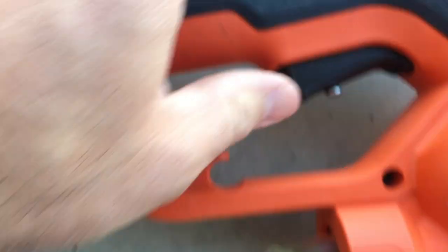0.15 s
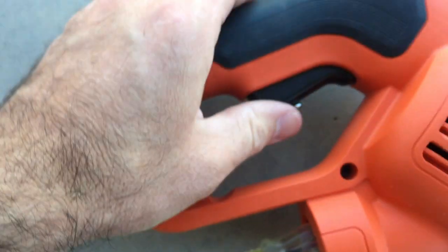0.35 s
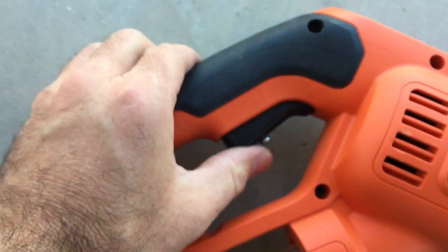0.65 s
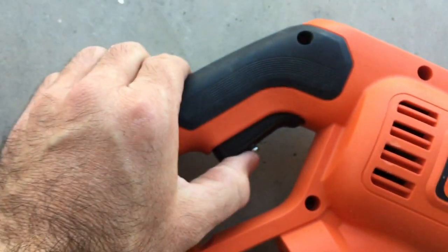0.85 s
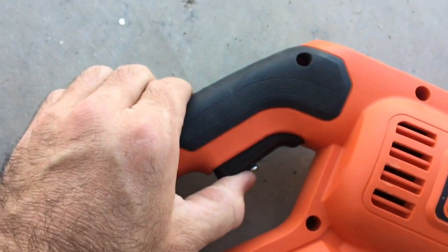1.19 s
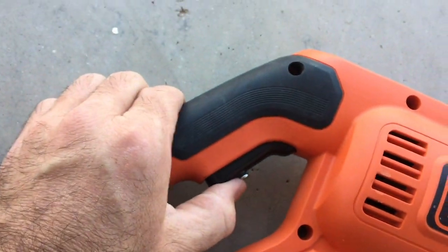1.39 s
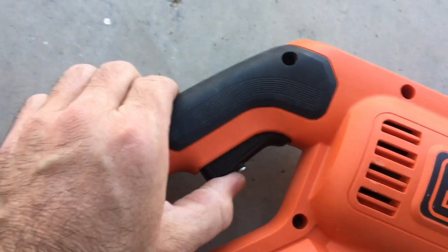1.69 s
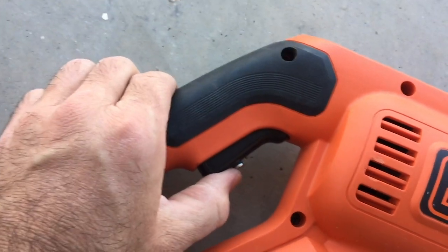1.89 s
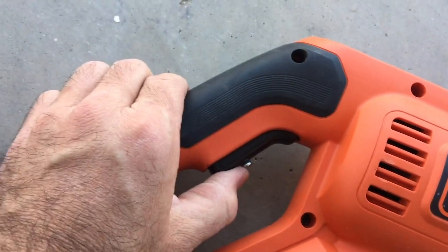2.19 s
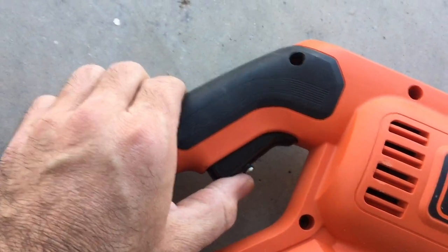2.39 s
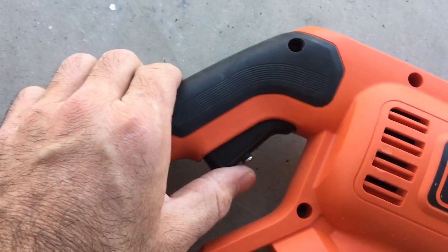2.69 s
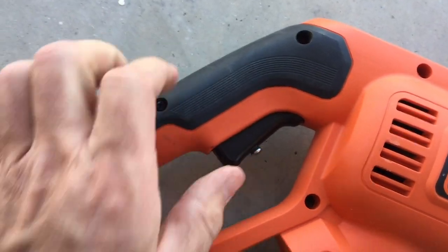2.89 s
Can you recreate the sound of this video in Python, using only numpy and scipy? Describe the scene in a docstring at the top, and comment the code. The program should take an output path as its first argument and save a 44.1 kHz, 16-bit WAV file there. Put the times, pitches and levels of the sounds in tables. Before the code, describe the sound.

A power trimmer's trigger snaps, its motor whines up, coasts down, then surges again

```python
"""A hand slides along the plastic handle of an electric garden trimmer outdoors, with soft fingertip pats.
A thumb taps the trigger, then presses it twice; the switch snaps at the first press.
Each press spins the motor up with a magnetic whine; released, it coasts down, gears and fan whirring
in the housing. Dull knocks pass through the handle, and wind rumbles on a mono microphone throughout.
Sines carry the motor tones, shaped noise the friction and air, and decaying modes the blows."""
import sys
import numpy as np
from scipy import signal
from scipy.fft import rfft, irfft, next_fast_len
from scipy.io import wavfile

SR = 44100
rng = np.random.default_rng(int(sys.argv[2]) if len(sys.argv) > 2 else 0)


def wav_out(sig):
    """Save sig, one row per channel (or a flat mono array), as 16-bit PCM at SR to the path in sys.argv[1]."""
    wavfile.write(sys.argv[1], SR, np.round(np.clip(np.atleast_2d(sig).T, -1, 1) * 32767).astype(np.int16))


def magnitude_from_level(level_db):
    """Linear magnitude for a level in decibels (20 dB per decade)."""
    exponent = np.asarray(level_db, float) / 20
    return 10 ** exponent


N = 134505
T = np.arange(N) / SR

# background air spectrum: pitch_hz [Hz], density_db [dB per Hz, relative]
AIR_SPECTRUM = [(180, -38), (300, -2), (366, -28), (405, -10.5), (511, -15), (656, -12), (787, -20),
                (946, -16.5), (1120, -18), (16000, -43)]
# wind strength: time_s [s], level_db [dB]
WIND_LEVEL = [(0.0, -49), (0.14, -40), (0.18, -50), (0.29, -44), (0.46, -50), (0.48, -41.5), (0.53, -56),
              (0.62, -37), (0.65, -55), (0.69, -37.5), (0.76, -51.5), (0.86, -39), (0.88, -57), (0.94, -32),
              (1.15, -41), (1.21, -38), (1.23, -37), (1.33, -24.5), (1.47, -49), (1.65, -49), (1.7, -39),
              (1.75, -48), (1.83, -31), (1.86, -55), (2.05, -53), (2.12, -36), (2.17, -53), (2.46, -43),
              (2.5, -57), (2.58, -39), (2.66, -58), (2.81, -51), (2.93, -32), (3.05, -59)]
# wind spectrum: pitch_hz [Hz], density_db [dB per Hz, relative]
WIND_SPECTRUM = [(12, -41), (20, -15), (34, -13), (49, 3.5), (106, 1.5), (288, -21.5), (387, -38),
                 (449, -40), (500, -34), (650, -72), (1100, -120)]
# dull knocks through the handle: start_s [s], level_db [dB, relative]
HANDLE_KNOCKS = [(.597, -42), (.927, -40), (1.236, -23), (1.305, -23), (1.81, -28), (2.87, -28),
                 (2.915, -25)]
# handle modes: pitch_hz [Hz], level_db [dB, relative], t60_s [s]
HANDLE_MODES = [(80, 0, .25), (130, -2, 0.14), (242, -4, 0.072), (396, -8, 0.059), (590, -20, 0.043)]
# strokes of skin on plastic: start_s [s], length_s [s], level_db [dB]
RUB_STROKES = [(0, 0.063, -60.5), (0.099, .09, -56), (0.183, 0.094, -65), (0.251, 0.12, -42),
               (0.357, 0.12, -45.5), (0.479, .07, -58), (0.52, .26, -62)]
# friction spectrum: pitch_hz [Hz], density_db [dB per Hz, relative]
RUB_SPECTRUM = [(240, -50), (400, -13), (545, -7.5), (865, -1.5), (1160, -6.5), (1460, 0), (2180, -2.5),
                (4440, -1.5), (7400, -12), (14800, -22), (16000, -16)]
# soft pats of a fingertip: start_s [s], level_db [dB, relative]
FINGER_PATS = [(.07, -41.5), (.12, -44), (.679, -48), (.734, -45)]
# taps on the trigger: start_s [s], ring_db [dB, relative], crack_db [dB]
TRIGGER_TAPS = [(.475, -38, -51), (.493, -40, -52), (.883, -37, -56)]
# trigger modes: pitch_hz [Hz], level_db [dB, relative], t60_s [s]
TRIGGER_MODES = [(898, 0.5, 0.041), (2090, -11, .03), (3200, -6.5, 0.07), (3880, 0.5, 0.023),
                 (4660, -10, 0.027), (6260, -7, 0.031)]
# switch snaps: start_s [s], ring_db [dB, relative], crack_db [dB]
SWITCH_SNAPS = [(1.3065, -26, -28), (1.309, -9, -18.5), (1.3205, -17, -28)]
# switch modes: pitch_hz [Hz], level_db [dB, relative], t60_s [s]
SWITCH_MODES = [(710, -15, .03), (1290, -1, 0.027), (2050, -3, .015), (2660, 5, 0.019), (3660, -6, .012),
                (6500, -16, 0.0088)]
# shaft speed and winding current: time_s [s], speed_rps [turns per s], current_db [dB]
MOTOR_RUN = [(1.31, 12, -37), (1.33, 58, -16), (1.345, 103, -13.5), (1.36, 146, -16.5), (1.375, 194, -22),
             (1.39, 230, -20.5), (1.405, 261, -15), (1.42, 281, -19), (1.435, 300, -23), (1.46, 332, -33),
             (1.49, 366, -36), (1.505, 370, -36), (1.61, 350, -40), (1.7, 330, -60), (1.75, 313, -55),
             (1.81, 307, -55), (1.86, 282, -55), (1.92, 279, -59), (1.965, 274, -57), (2.0, 255, -57),
             (2.055, 255, -43), (2.09, 237, -54.5), (2.18, 222, -65), (2.2, 230, -17), (2.215, 257, -21),
             (2.23, 273, -19), (2.245, 294, -22.5), (2.26, 314, -23), (2.29, 347, -32), (2.33, 377, -34),
             (2.41, 427, -40), (2.43, 428, -44), (2.49, 410, -55), (2.65, 366, -55), (2.81, 324, -51),
             (2.97, 288, -48), (3.05, 272, -55)]
# tones driven by the current: multiple [of shaft speed], level_db [dB, relative]
MAGNETIC_ORDERS = [(8, -12.5), (12, -4.5), (16, -5), (32, -7.5), (64, -32)]
# tones of rotor, commutator and fan: multiple [of shaft speed], level_db [dB, relative]
ROTOR_ORDERS = [(2, -39), (16, -40), (32, -47), (33, -37.5), (48, -48)]
# housing response to passing tones: centre_hz [Hz], width_hz [Hz], gain_db [dB]
HOUSING_PEAKS = [(1100, 760, -10), (1960, 440, 6), (2710, 560, 6.5), (3300, 300, 10.5), (3760, 240, 7),
                 (4420, 290, 10.5), (4870, 330, -3), (5510, 180, 11), (5980, 230, 11), (6600, 490, 10),
                 (7300, 380, 8), (8560, 520, 11), (9510, 530, 8), (10330, 1040, 2.5), (12000, 500, 8),
                 (14200, 1200, 11)]
# air cavities that colour the whirr: centre_hz [Hz], width_hz [Hz], gain_db [dB]
CAVITY_PEAKS = [(1334, 74, 2), (3180, 170, 0.5), (4650, 220, 2), (6480, 250, 3), (7650, 270, -2.5),
                (9450, 430, 3.5), (12500, 420, 3)]
# gear and air noise: time_s [s], level_db [dB]
WHIRR_LEVEL = [(1.316, -47), (1.322, -21), (1.34, -18.5), (1.37, -22), (1.42, -20), (1.45, -15),
               (1.5, -15.5), (1.57, -17), (1.7, -18.5), (1.85, -16), (1.97, -19.5), (2.03, -20.5),
               (2.07, -19.5), (2.1, -20), (2.12, -19), (2.15, -23), (2.18, -21.5), (2.23, -19.5),
               (2.28, -16), (2.4, -14), (2.5, -16), (2.6, -18), (2.8, -19), (2.86, -19.5), (2.92, -22),
               (2.95, -17), (2.98, -22), (3.05, -21)]
# whirr spectrum at slow speed: pitch_hz [Hz], density_db [dB per Hz, relative]
SLOW_SPECTRUM = [(88, -37), (150, -24), (231, -6.5), (297, -6.5), (837, 0.5), (998, -6), (1340, -2),
                 (1560, -6), (1760, -2), (2180, -6), (2360, -2), (4670, -8), (5150, -10.5), (6640, -6),
                 (10800, -20), (15100, -24.5), (16000, -25)]
# whirr spectrum at fast speed: pitch_hz [Hz], density_db [dB per Hz, relative]
FAST_SPECTRUM = [(88, -52), (150, -22), (275, -14), (354, -7.5), (414, -11.5), (514, -19), (649, -8),
                 (1120, -10.5), (1260, -8), (2060, -13.5), (3290, -10), (4950, -12.5), (5680, -16.5),
                 (6510, -11.5), (7770, -17.5), (12400, -20), (16000, -24)]

SLOW_RPS, FAST_RPS = 224, 408.5  # shaft speeds of the two whirr spectra, turns per s


def rms_one(x):
    """Normalisation: scale to unit root mean square."""
    return x / np.sqrt(np.mean(x ** 2) + 1e-20)


def in_time(rows):
    """Linear interpolation: each column follows the time axis."""
    times_s, *columns = np.transpose(rows)
    return [np.interp(T, times_s, column) for column in columns]


def drift(rate_hz):
    """Low-passed randomness: a slow fluctuation of spread 1, computed at an eighth of the sample rate."""
    pole = np.exp(-16 * np.pi * rate_hz / SR)
    noise = rng.standard_normal(N // 8 + 4002)
    slow = signal.lfilter([1], [1, -2 * pole, pole * pole], noise)[4000:]  # skip the settling
    return np.interp(np.arange(N) / 8, np.arange(len(slow)), rms_one(slow - slow.mean()))


def coloured(x, spectrum):
    """Spectral shaping: weight a noise in frequency, then set its rms to 1."""
    hz, db = np.transpose(spectrum)
    size = next_fast_len(N)
    log_hz = np.log(np.arange(size // 2 + 1) * SR / size + 1)
    gain = magnitude_from_level(np.interp(log_hz, np.log(hz), db, left=-90, right=-90))
    return rms_one(irfft(rfft(x, size) * gain, size)[:N])


def struck(events, modes, spread_db):
    """Modal excitation: every blow strikes every damped mode with a strength of its own."""
    start_s, blow_db, *_ = np.transpose(events)
    luck = rng.normal(0, 1, (len(start_s), len(modes)))
    out = 0
    for k, (hz, level_db, t60_s) in enumerate(modes):
        clicks = np.full(N, 1e-18)
        strength_db = blow_db + level_db + spread_db * luck[:, k]
        clicks[(start_s * SR).astype(int)] = magnitude_from_level(strength_db) * (-1) ** k
        radius = magnitude_from_level(-60 / (t60_s * SR))  # falls 60 dB in t60_s
        angle = 2 * np.pi * hz / SR
        resonator = [1, -2 * radius * np.cos(angle), radius * radius]
        out = out + signal.lfilter([0, np.sin(angle)], resonator, clicks)
    return out


def cracks(events):
    """Impact noise: each blow starts a band-limited burst that decays exponentially."""
    decay_s, band_hz = 0.0028, [600, 7900]
    level = 0
    for start_s, _, crack_db in events:
        level = level + magnitude_from_level(crack_db) * (T > start_s) * np.exp(-np.abs(T - start_s) / decay_s)
    band = signal.butter(2, band_hz, "band", fs=SR, output="sos")
    return level * rms_one(signal.sosfilt(band, rng.standard_normal(N)))


def lift_db(hz, peaks):
    """Resonance response: sum bell-shaped gains, or dips, around each centre."""
    return sum(gain_db * np.exp(-((hz - centre_hz) / width_hz) ** 2)
               for centre_hz, width_hz, gain_db in peaks)


def background_air():
    """Stationary noise: the air keeps a constant level and spectrum."""
    return magnitude_from_level(-64) * coloured(rng.standard_normal(N), AIR_SPECTRUM)


def wind():
    """Turbulence: gusts modulate a low-frequency noise at the microphone."""
    gusts_db = in_time(WIND_LEVEL)[0] + 2.4 * drift(9.8)
    return magnitude_from_level(gusts_db) * coloured(rng.standard_normal(N), WIND_SPECTRUM)


def handle_knocks():
    """Structure-borne sound: low handle modes ring through a one-pole low-pass."""
    return signal.lfilter([.05], [1, -.95], struck(HANDLE_KNOCKS, HANDLE_MODES, 1.3))


def sliding_hand():
    """Friction: strokes of skin on plastic are grainy noise with a quick rise and a slower fall."""
    rise_share = 0.26  # of the stroke
    level = 0
    for start_s, length_s, level_db in RUB_STROKES:
        times_s = [start_s - .005, start_s + rise_share * length_s,
                   start_s + 0.6 * length_s, start_s + length_s]
        level = level + magnitude_from_level(level_db) * np.interp(T, times_s, [0.025, 0.95, .8, 0.0038])
    return level * magnitude_from_level(1.2 * drift(40.0)) * coloured(rng.standard_normal(N), RUB_SPECTRUM)


def fingertip_pats():
    """Soft contact: the trigger modes ring with their treble low-passed."""
    soft = signal.butter(2, 2200, fs=SR, output="sos")  # corner in Hz
    return magnitude_from_level(-5) * signal.sosfilt(soft, struck(FINGER_PATS, TRIGGER_MODES, 2.3))


def trigger_taps():
    """Impact: each thumb tap joins a noise burst to ringing trigger modes."""
    return cracks(TRIGGER_TAPS) + magnitude_from_level(-10) * struck(TRIGGER_TAPS, TRIGGER_MODES, 1.2)


def switch_snaps():
    """Impact: each snap joins a noise burst to short switch modes."""
    return cracks(SWITCH_SNAPS) + magnitude_from_level(-3.5) * struck(SWITCH_SNAPS, SWITCH_MODES, 2.3)


def shaft_tones(orders, speed, turns):
    """Order tones: sines on multiples of shaft speed, coloured by the housing response."""
    out = 0
    for order, level_db in orders:
        multiple = round(order)
        hz = multiple * speed
        flicker_db = 4.2 * drift(70.0)
        level = magnitude_from_level(level_db + lift_db(hz, HOUSING_PEAKS) + flicker_db)
        tone = np.sin(2 * np.pi * (multiple * turns + rng.random()))
        out = out + level * tone * (hz < 17000)
    return out


def magnetic_whine(speed, turns, current_db):
    """Magnetic force: current-driven tones and a hum pulse with the mains."""
    pulse_hz, pulse_depth, hum_db = 120, 0.57, -26
    mains = np.cos(2 * np.pi * pulse_hz * T)
    whine = (1 + pulse_depth * mains) * shaft_tones(MAGNETIC_ORDERS, speed, turns)
    return magnitude_from_level(current_db) * (whine + magnitude_from_level(hum_db) * mains)


def rotor_tones(speed, turns):
    """Rotation: rotor, commutator and fan tones grow with speed squared up to the slow speed."""
    return shaft_tones(ROTOR_ORDERS, speed, turns) * np.clip(speed / SLOW_RPS, 0, 1) ** 2


def shaft_shake(speed, turns):
    """Once-a-turn vibration: its amplitude grows with a power of speed."""
    fast_db, power = -24, 3.24  # rms level at the fast speed
    level = np.sqrt(2) * magnitude_from_level(fast_db + 1.1 * drift(15.0)) * np.abs(speed / FAST_RPS) ** power
    return level * np.sin(2 * np.pi * turns)


def gear_and_fan_whirr(speed, turns):
    """Broadband excitation: random gear hits and air noise change colour with speed."""
    hits_per_turn, hit_share = 9.0, 0.21  # mean number; share of power
    turn_depth, start_dull_db = 0.13, -17
    hits = rng.random(N) < hits_per_turn * speed / SR
    hits = hits * magnitude_from_level(2.8 * np.minimum(rng.exponential(1, N), 3)) * rng.choice([-1, 1], N)
    source = np.sqrt(hit_share) * rms_one(hits) + np.sqrt(1 - hit_share) * rng.standard_normal(N)
    cavity_gain = magnitude_from_level(lift_db(np.arange(N // 2 + 1) * SR / N, CAVITY_PEAKS))
    source = irfft(rfft(source) * cavity_gain, N)
    fast = np.clip((speed - SLOW_RPS) / (FAST_RPS - SLOW_RPS), 0, 1)
    whirr = (1 - fast) * coloured(source, SLOW_SPECTRUM) + fast * coloured(source, FAST_SPECTRUM)
    # below the slow speed the treble is weaker
    dull = signal.sosfilt(signal.butter(2, 4500, fs=SR, output="sos"), whirr)
    spun_up = np.clip(speed / SLOW_RPS, 0, 1)
    whirr = dull + (whirr - dull) * magnitude_from_level(start_dull_db * (1 - spun_up))
    once_a_turn = 1 + turn_depth * np.sin(2 * np.pi * turns)
    return whirr * once_a_turn * magnitude_from_level(in_time(WHIRR_LEVEL)[0] + 0.85 * drift(24.0))


def motor():
    """Common rotation: one jittering shaft angle locks whine, rotor tones, shake and whirr."""
    speed, current_db = in_time(MOTOR_RUN)
    on = T > MOTOR_RUN[0][0]
    turns = np.cumsum(speed * (1 + .007 * drift(71.0))) / SR
    tonal = magnetic_whine(speed, turns, current_db) + rotor_tones(speed, turns)
    return on * (tonal + shaft_shake(speed, turns) + gear_and_fan_whirr(speed, turns))


def scene():
    """Superposition: all sources add, alike on both channels."""
    background = background_air() + wind()
    handling = handle_knocks() + sliding_hand() + fingertip_pats()
    trigger = trigger_taps() + switch_snaps()
    mono = background + handling + trigger + motor()
    return np.array([mono, mono])


def band_limit(x):
    """A steep low-pass at the top of the band."""
    return signal.sosfilt(signal.butter(12, 16730, fs=SR, output="sos"), x)


def record(dry):
    """Soft saturation: a hyperbolic tangent rounds the peaks of the one microphone on both channels."""
    mix = np.tanh(dry)
    return band_limit(mix)


dry = scene()
out = record(dry)
wav_out(out)
```